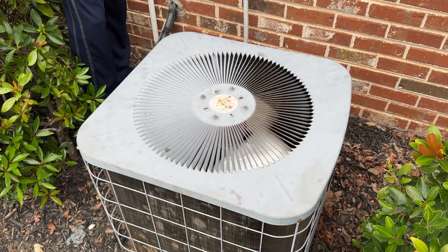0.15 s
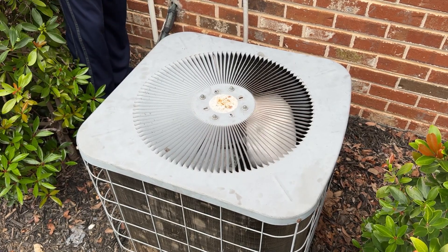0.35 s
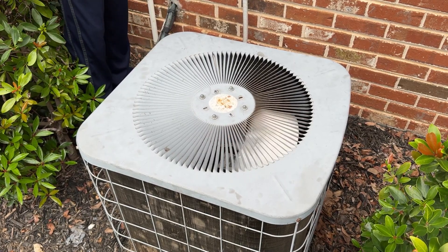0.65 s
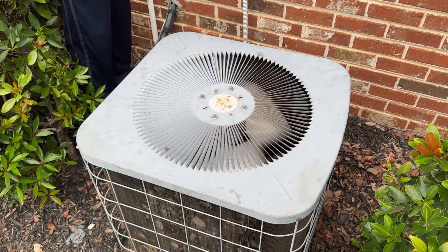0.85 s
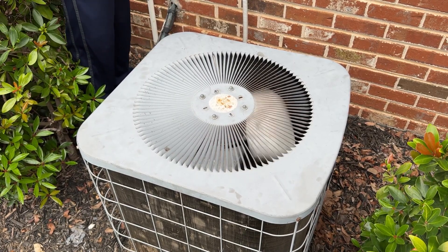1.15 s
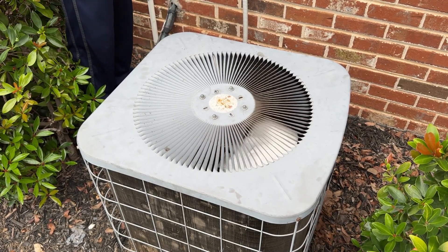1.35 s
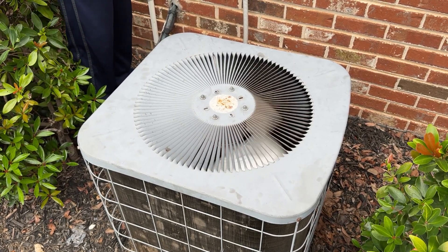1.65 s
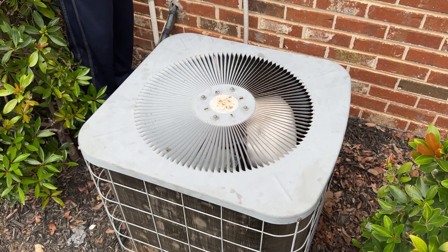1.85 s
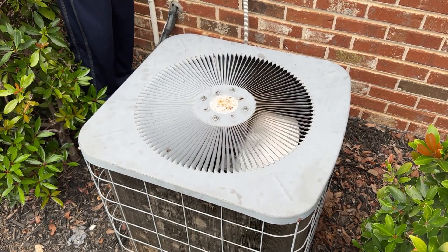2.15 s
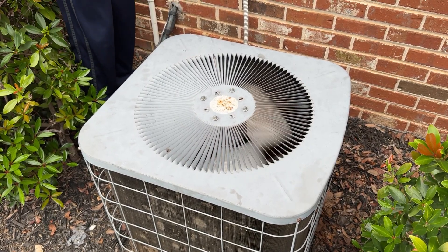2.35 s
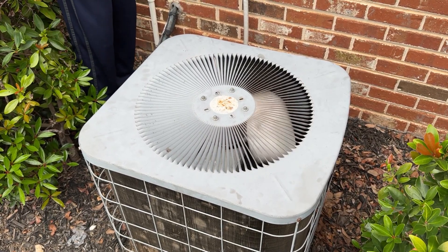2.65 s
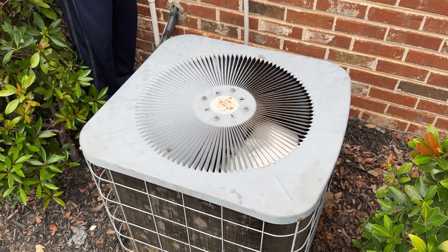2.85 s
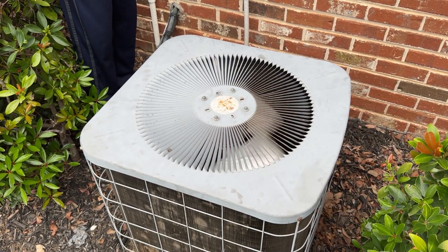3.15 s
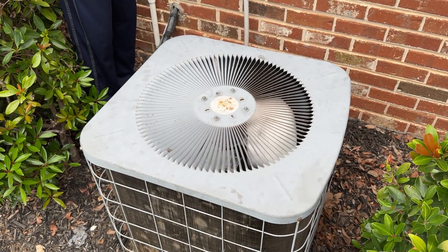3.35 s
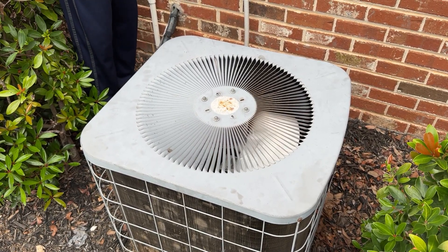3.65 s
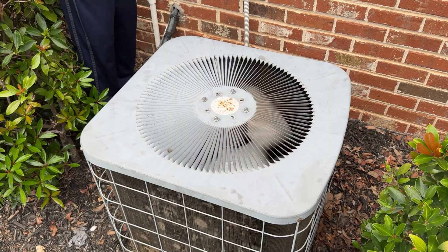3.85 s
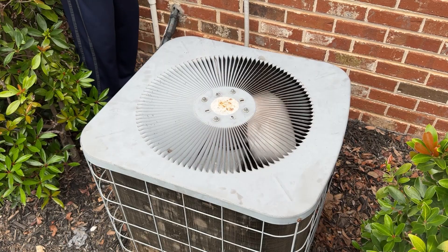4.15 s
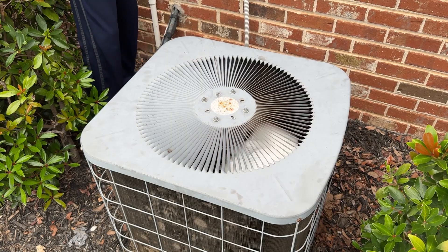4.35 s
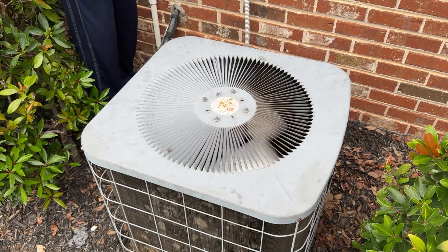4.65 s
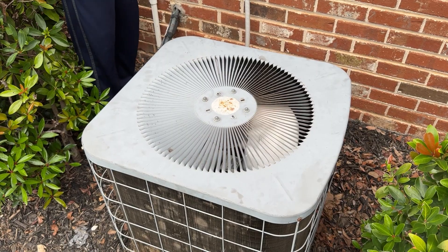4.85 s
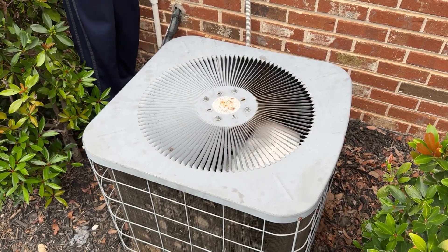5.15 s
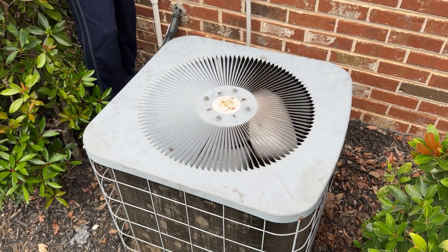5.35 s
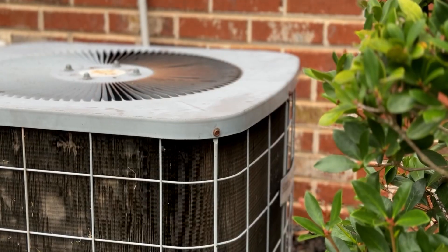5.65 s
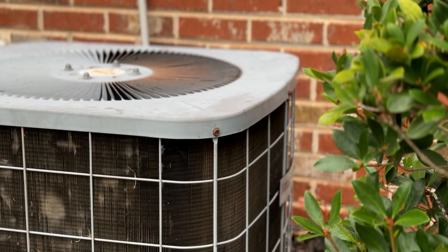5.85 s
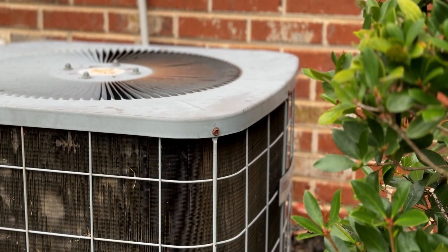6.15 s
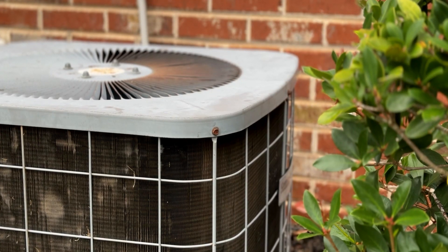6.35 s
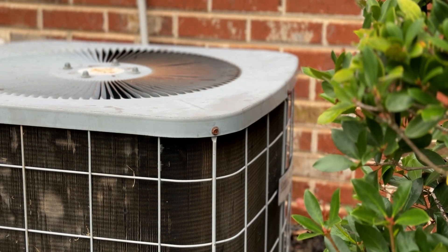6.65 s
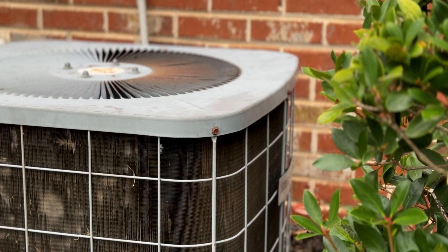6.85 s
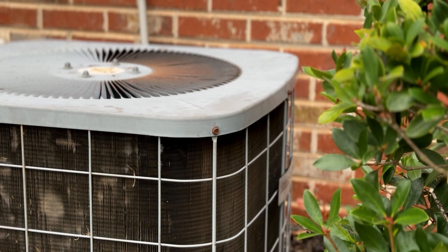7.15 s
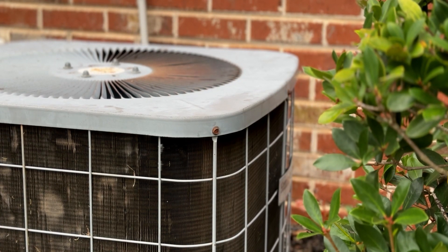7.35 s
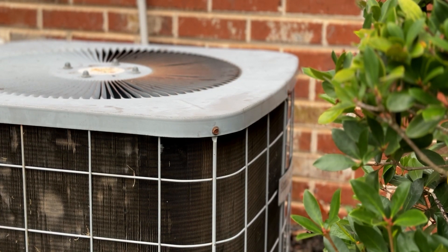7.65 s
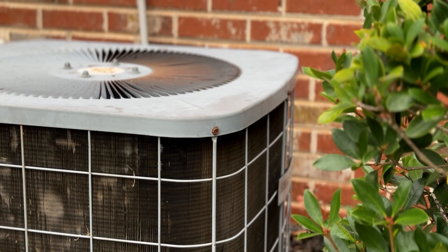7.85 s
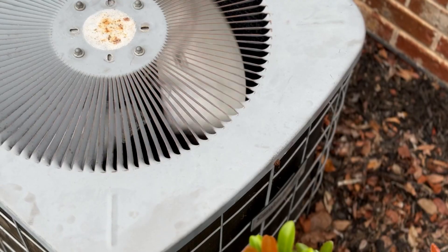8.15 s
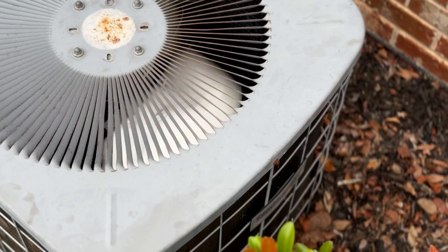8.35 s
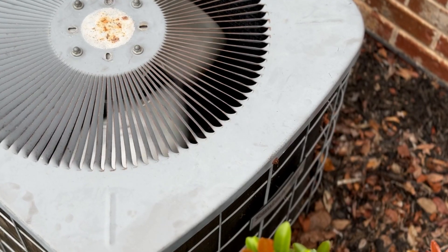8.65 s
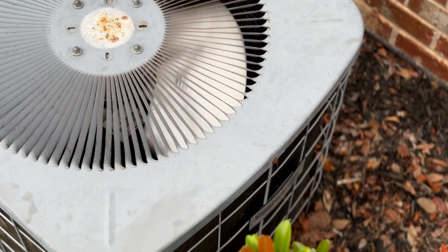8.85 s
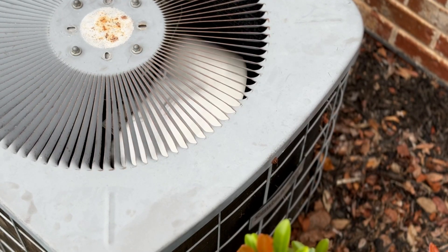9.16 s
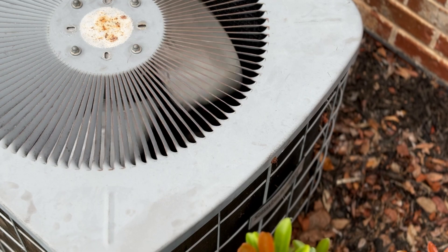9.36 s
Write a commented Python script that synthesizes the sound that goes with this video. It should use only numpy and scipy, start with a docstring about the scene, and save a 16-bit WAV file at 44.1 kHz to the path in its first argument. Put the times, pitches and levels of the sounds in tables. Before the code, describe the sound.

An outdoor air conditioner runs steadily beside a brick wall. Its fan throbs and pushes out a rush of air over a low motor hum and a thin compressor whine. It is heard first from above, with a lightly pulsing hiss. After about five seconds the sound switches to the side, with a stronger whine and soft low rumbles, then moves close over the grille, where the fan drones more strongly.

```python
"""An outdoor air conditioner runs by a brick wall. Its three-blade fan throbs and rushes, the motor iron
hums, and the compressor sings a long series of shaft harmonics. It is heard first from above, where the
hiss climbs and beats; from 5.4 s beside the coil, where low rumbles swell and the sound drops out for a
moment at 7.4 s; and from 8 s close over the grille. Throughout, in the top octave, the right channel
is inverted and early."""
import sys
import numpy as np
from scipy import signal
from scipy.fft import rfft, irfft, next_fast_len
from scipy.io import wavfile
from scipy.ndimage import uniform_filter1d

SR = 44100
rng = np.random.default_rng(int(sys.argv[2]) if len(sys.argv) > 2 else 0)


def bounce(signal):
    """Save signal as a 16-bit WAV file at the path given by the first command-line argument."""
    frames = np.transpose(np.atleast_2d(signal))
    limited = np.clip(frames, -1, 1)
    pcm = np.round(limited * 32767).astype(np.int16)
    wavfile.write(sys.argv[1], SR, pcm)


N = 419391

# Listening places: above, beside, close. "By place" means three values in that order.
# Each row: start and end in seconds, compressor shaft rate in Hz at start and at end, blade rate in Hz.
# The shaft slows as pressure builds.
PLACES = [(0, 5.445, 58.864, 58.832, 57.32), (5.445, 8.0, 58.812, 58.8, 57.4),
          (8.0, 9.52, 58.788, 58.788, 57.35)]
# Likeness of the channels from above, and at the two near places.
# Each row: frequency in Hz, coherence from 0 to 1, right phase lead in radians, left minus right in dB.
STEREO_ABOVE = [(60, .995, 0, -.3), (120, .993, 0, -.3), (250, .999, 0, -.2), (500, .982, -.06, -.2),
                (1100, .93, 0, .8), (1600, .8, 0, 1.4), (2300, .68, -.7, -4.1), (2800, .7, -2.3, -2.5),
                (3700, .18, -3.2, 4), (5250, .56, -5.3, -3), (7000, .4, -6.1, 0), (8300, .7, -6.2, .7)]
STEREO_NEAR = [(60, .998, 0, -.1), (170, .96, 0, 0), (300, .98, -.1, .1), (600, .91, -.17, .2),
               (1100, .97, -.15, 1.0), (1600, .76, 0, 2.6), (1900, .83, .4, 2.3), (2100, .99, 0, .2),
               (2500, .99, 0, .2), (3500, .9, -.6, -.5), (4300, .93, -.2, 0), (4800, 1, 0, 0),
               (6400, 1, 0, 0), (7000, .87, .4, -.2), (7600, 1, 0, 0)]

# Low swells. Each row: crest and width in seconds, frequency in Hz, crest level in dB.
RUMBLES = [(6.1, .5, 70, -38), (7.15, .4, 109, -33.5), (7.85, 0.42, 179, -33.5)]
# Shell resonances. Each row: frequency and width in Hz, base level in dB by place.
RESONANCES = [(4400, 55, -66, -80, -80), (4680, 70, -61, -80, -80), (5270, 260, -59, -72, -70),
              (6280, 260, -62, -72, -66), (13770, 90, -85, -66, -74)]
# Swell of those resonances. Each row: time in seconds, gain in dB.
RING_SWELL = [(0, -3), (1.3, 0), (2, -2), (3.5, 4), (4.4, 3), (5.4, 2)]

# Air through coil and grille. Each row: frequency in Hz, base spectral density in dB by place.
AIR_SPECTRUM = [(25, -78, -80, -79), (40, -68, -68, -67), (50, -54, -58, -55), (66, -50, -50, -52),
                (88, -50, -53, -50), (108, -49, -50, -49), (135, -50, -54, -49), (200, -52.5, -52, -53),
                (262, -51, -57, -54.5), (300, -50, -56.5, -55), (400, -53, -58, -57),
                (480, -55.5, -62, -58.5), (700, -60, -64, -60), (850, -66, -64, -60.5),
                (980, -62, -66, -63), (1180, -66, -70, -66), (1300, -66, -71, -68), (1600, -70, -74, -71),
                (2500, -73, -79, -79), (3050, -79, -80, -80), (3500, -78, -82, -79), (3950, -81, -83, -81),
                (4850, -81, -84, -83), (5200, -81, -85, -83), (5750, -83, -86, -84), (6800, -83, -87, -84),
                (8200, -85, -89, -88), (9300, -88, -93, -93), (11000, -86, -96, -93),
                (12400, -88, -94, -91), (13400, -86, -91, -89), (14300, -90, -93, -92),
                (15600, -92, -94, -93)]
# Broad lifts and dips in that spectrum. Each row: frequency and width in Hz, gain in dB by place.
AIR_LIFTS = [(620, 82, -1.5, 0, 1.5), (746, 180, 2, 1.5, 3), (1050, 120, 1.5, 1, 1),
             (2070, 240, 2, -1, -1.5), (2860, 250, 2, 3, 7), (4380, 150, 3.5, -2.5, 1),
             (5430, 150, -1, -2, -1), (7200, 310, -1.5, 0, -1), (13500, 250, 4, 3, 4)]
# Unevenness of the rush, one row a place. Each row: bass, treble and shared treble flicker in dB,
# then the modulation depths of the fan shaft throb and the gas pulse.
AIR_FLICKER = [(1.3, 0.65, 1.2, 0.05, 0.14), (1.36, .5, 0.6, .02, 0.1), (1.6, 1, 1, .02, .04)]
# Beats in the hiss, blades against compressor and compressor against mains.
# Each row: rate in Hz, depth in dB, time of one crest in seconds.
HISS_BEATS = [(3.13, 0.73, 2.52), (2.26, 0.6, 2.54)]

# Swell of the iron hum. Each row: time in seconds, gain in dB.
IRON_SWELL = [(0, -2), (1, -5), (1.5, 0.5), (5.4, 0.5), (5.8, 0), (6.5, 3), (6.9, 3), (7.3, -4), (7.9, 0),
              (9.5, 0)]
# Fan tones. Each row: multiple of the blade rate, base level in dB by place.
BLADE_TONES = [(1, -40.5, -42, -36.5), (2, -34.5, -43.5, -31.5), (3, -40.5, -49, -43), (4, -37.5, -52, -37),
               (5, -47, -44.5, -48), (6, -55, -47.5, -54)]

# Compressor harmonics: the low ones, those that sing out, and the mean envelope of the other high ones.
# Each row: multiple of the shaft rate, base level in dB by place.
THRUM = [(1, -47, -47, -43), (2, -35, -61, -36), (4, -37, -30, -36), (6, -39.5, -49, -65),
         (7, -58, -50.5, -63), (8, -44, -53, -58)]
WHINE = [(14, -65, -51, -55), (15, -53, -50, -62), (16, -58, -43, -42.5), (18, -50, -40, -39.5),
         (19, -53, -46, -59), (20, -62, -45, -44), (21, -62, -55, -55), (22, -59, -48, -54),
         (23, -67, -52, -57), (25, -70, -51, -52), (26, -57, -63, -50), (27, -64, -62, -50),
         (28, -58, -60, -64), (29, -71, -56, -63), (30, -64, -59, -57), (31, -67, -49, -64),
         (33, -64, -57, -59), (35, -71, -61, -64), (37, -71, -59, -76), (38, -60, -63, -66),
         (46, -70, -64, -60), (47, -65, -50, -52), (48, -66, -58, -56), (49, -69, -59, -59),
         (50, -67, -60, -60), (51, -67, -71, -56), (54, -79, -58, -61), (55, -61, -57, -66),
         (60, -69, -67, -61), (61, -65, -66, -69), (62, -65, -71, -67), (69, -77, -66, -71),
         (75, -70, -68, -80), (77, -80, -68, -79), (81, -75, -62, -67), (82, -72, -66, -69),
         (83, -68, -66, -70), (84, -80, -62, -62), (86, -65, -77, -69), (88, -67, -85, -67),
         (91, -67, -68, -76), (93, -75, -63, -72), (94, -72, -64, -66), (96, -71, -77, -70),
         (98, -78, -76, -60), (101, -76, -63, -75), (103, -71, -77, -69), (104, -73, -68, -67),
         (106, -74, -70, -61), (109, -70, -68, -75), (111, -73, -74, -65), (112, -72, -75, -67),
         (113, -69, -70, -72), (114, -68, -72, -74), (115, -68, -79, -72), (116, -68, -67, -70),
         (117, -68, -74, -64), (118, -68, -77, -76), (119, -72, -74, -73), (120, -75, -67, -69),
         (121, -78, -65, -64), (122, -85, -75, -66), (132, -86, -69, -71), (133, -81, -68, -64),
         (134, -86, -65, -74), (137, -81, -68, -67), (138, -77, -75, -70), (139, -76, -79, -77),
         (221, -80, -67, -74), (224, -80, -69, -73), (226, -80, -66, -73), (234, -79, -65, -71),
         (235, -80, -69, -71), (248, -82, -70, -75)]
WHINE_FLOOR = [(14, -65, -63, -61), (36, -68, -66, -66), (52, -71, -69, -69), (68, -76, -73, -72),
               (85, -72, -73, -72), (100, -77, -75, -72), (127, -80, -74, -72), (165, -79, -75, -76),
               (200, -78, -78, -76), (228, -75, -74, -74), (243, -80, -80, -79), (267, -81, -79, -78)]
# Swell of the two main hums. Each row: time in seconds, gains of harmonics 2 and 4 in dB.
HUM_SWELL = [(0, -4, 2.5), (.6, 2, 3), (1.1, 2, 0), (1.8, 3, 3.5), (2.8, -2, -5), (3.6, 2, -4),
             (4.5, 0.5, -3), (5.4, 7, -5), (5.46, 0, 0), (8, 0, 1), (8.5, 4, -1), (9.5, -5, 1)]
# Swell of the harmonics near 2.8 kHz. Each row: time in seconds, gain in dB.
WHISTLE_SWELL = [(5.5, -2.5), (5.95, 2.5), (6.3, 0), (6.55, -3), (6.75, 3.5), (6.88, -2.5), (7.3, 0.5),
                 (7.5, 1.5), (7.75, -2), (8.1, 2.5), (8.7, 0), (9.3, 0)]

IN_PHASE_S = (1.93, 6.43, 8.65)  # by place: the hums of fan, compressor and iron crest together
BUFFET_DEPTH = (.18, .15, .2)  # by place: base depth of the blade throb in the rush
MAINS_HZ, IRON_BASE_DB = 60, (-36, -38.5, -41.5)  # levels by place
TURN = 2 ** 16  # samples in the wavetable of one rotation


def undb(db):
    """Amplitude grows tenfold for every 20 dB."""
    return 10 ** (np.asarray(db, float) / 20)


def walk(size, rate_hz):
    """Low-pass random motion: held levels, smoothed twice, with a spread near 1."""
    hold = int(SR / rate_hz)
    levels = np.repeat(rng.standard_normal(size // hold + 1), hold)
    return 1.28 * uniform_filter1d(uniform_filter1d(levels, hold), hold)[:size]


def swell(t, table):
    """A gain envelope, linear in decibels between the rows of a table."""
    return undb(np.interp(t, *np.transpose(table)))


def partials(table, place):
    """The line spectrum at one place: harmonic orders and levels in dB."""
    rows = np.array(table)
    return np.round(rows[:, 0]).astype(int), rows[:, place + 1]


def stereo(hz, place):
    """Partial coherence: the likeness, phase lead and balance of the channels at each frequency."""
    knots, coherence, lead, pan_db = np.transpose(STEREO_NEAR if place else STEREO_ABOVE)
    top = hz > 8700
    coherence = np.where(top, .94, np.interp(hz, knots, coherence))
    # Inversion and a time lead of 1/3150 s turn the phase steadily with frequency.
    lead = np.where(top, 2 * np.pi * (hz - 11025) / 3150, np.interp(hz, knots, lead))
    return coherence, lead, np.where(top, 0, np.interp(hz, knots, pan_db))


def harmonics(t, place, rate_hz, orders, db, drift, waver_db, groups=1, in_phase=None):
    """Fourier series of a drifting rotation. Returns the stereo sound and the angle in turns."""
    coherence, lead, pan_db = stereo(orders * np.mean(rate_hz), place)
    phase, scatter = rng.standard_normal((len(orders), 2)).T
    if in_phase is not None:  # harmonics 2 and 4 crest at this sample
        phase[np.isin(orders, (2, 4))] = 0
    right_shift = np.exp(1j * (lead + np.arccos(coherence) * scatter))
    balance = np.array([undb(pan_db / 2), undb(-pan_db / 2) * right_shift])
    amplitudes = undb(db) * np.exp(2j * np.pi * phase) * balance
    angle = np.cumsum(rate_hz * (1 + drift * walk(len(t), 2.01))) / SR
    angle = (angle - angle[in_phase or 0]) % 1
    out = 0
    for k in range(groups):  # each group wavers independently
        spectrum = np.zeros((2, TURN // 2 + 1), complex)
        spectrum[:, orders[k::groups]] = amplitudes[:, k::groups]
        cycle = irfft(spectrum) * TURN / np.sqrt(2)
        out = out + undb(waver_db * walk(len(t), 7.01)) * cycle[:, (angle * TURN).astype(int)]
    return out, angle


def rumble(t):
    """Narrow-band low noise swells under Gaussian envelopes, alike in both channels."""
    out = 0
    for crest, width, hz, db in RUMBLES:
        bandpass = signal.butter(2, [hz / 1.1, hz * 1.1], "bandpass", fs=SR, output="sos")
        band = signal.sosfilt(bandpass, rng.standard_normal(len(t)))
        envelope = np.exp(-.5 * (2 * (t - crest) / width) ** 2)
        out = out + undb(db) * envelope * band / band.std()
    return out


def shell_ringing(t, place):
    """Resonance: gas hiss excites narrow modes of the shell, each fluttering alone."""
    size = next_fast_len(len(t))
    hz = np.arange(size // 2 + 1) * SR / size
    _, lead, _ = stereo(hz, place)
    out = 0
    for mode_hz, width, *db in RESONANCES:
        band = rfft(rng.standard_normal(size)) / (1 + (2 * (hz - mode_hz) / width) ** 4)
        pair = irfft(np.array([band, band * np.exp(1j * lead)]), size)[:, :len(t)]
        out = out + undb(db[place] + walk(len(t), 5)) * pair / pair.std()
    return out * swell(t, RING_SWELL)


def hiss_beating_db(t):
    """Beating: the treble from above throbs at two difference frequencies as it climbs and wanders."""
    climb = -1.5 * np.exp(-t / .62)
    beats = sum(db * np.cos(2 * np.pi * hz * (t - crest)) for hz, db, crest in HISS_BEATS)
    return climb + beats + .4 * walk(len(t), 7.4)


def air_spectrum(hz, size, place):
    """Flow through coil and grille makes broadband noise, partly coherent between the channels."""
    rows = np.array(AIR_SPECTRUM)
    colour = undb(np.interp(np.log(hz), np.log(rows[:, 0]), rows[:, place + 1])) * np.sqrt(SR / 2)
    for centre, width, *lift_db in AIR_LIFTS:
        colour *= undb(lift_db[place] / (1 + (2 * (hz - centre) / width) ** 2))
    coherence, lead, pan_db = stereo(hz, place)
    left, independent = rfft(rng.standard_normal((2, size)))
    right = coherence * np.exp(1j * lead) * left + np.sqrt(1 - coherence ** 2) * independent
    return colour * np.array([left * undb(pan_db / 2), right * undb(-pan_db / 2)])


def air_rush(t, place, blade_hz, shaft_angle):
    """Amplitude modulation: flickering bands of air noise throb with blades, fan shaft and gas pulses."""
    size = next_fast_len(len(t))
    hz = np.maximum(np.arange(size // 2 + 1) * SR / size, 1)
    spectrum = air_spectrum(hz, size, place)
    bass_db, treble_db, flutter_db, throb_depth, pulse_depth = AIR_FLICKER[place]
    flutter = walk(len(t), 40)
    shared_db = flutter_db * (flutter - uniform_filter1d(flutter, SR // 6))  # only the quick part
    if place == 0:
        shared_db += hiss_beating_db(t)
    # One fan turn is three blade passes; gas leaves twice a compressor turn.
    throb = throb_depth * np.sin(2 * np.pi * blade_hz / 3 * t)
    pulse = pulse_depth * (np.sin(4 * np.pi * shaft_angle) + .7 * np.sin(8 * np.pi * shaft_angle))
    # Every blade pass buffets the air, some gusts harder than others.
    buffet = BUFFET_DEPTH[place] * undb(3.3 * walk(len(t), 6)) * np.sin(2 * np.pi * blade_hz * t)
    out = 0
    for centre in 20 * 2 ** np.arange(0, 10.5, .5):  # half-octave steps from 20 Hz
        window = np.clip(1 - 2 * abs(np.log2(hz / centre)), 0, 1)
        treble = np.clip(np.log(centre / 1200) / np.log(9000 / 1200), 0, 1)
        middle = np.clip(1 - abs(np.log2(centre / 550)) / 2, 0, 1)
        own_db = (bass_db + (treble_db - bass_db) * treble) * walk(len(t), 14)
        gain = undb(own_db + treble * shared_db) * (1 + treble * (throb + pulse) + middle * buffet)
        out = out + gain * irfft(spectrum * window, size)[:, :len(t)]
    return out


def iron_hum(t, place, in_phase):
    """Forced vibration: the motor iron hums at four times the mains frequency."""
    hum, _ = harmonics(t, place, MAINS_HZ, np.array([4]), IRON_BASE_DB[place],
                       drift=.0001, waver_db=1.1, in_phase=in_phase)
    return swell(t, IRON_SWELL) * hum


def fan_blades(t, place, blade_hz, in_phase):
    """Periodic blade passage radiates harmonics, made unsteady by the turbulent inflow."""
    tones, _ = harmonics(t, place, blade_hz, *partials(BLADE_TONES, place),
                         drift=.00092, waver_db=2.5, groups=3, in_phase=in_phase)
    return tones


def compressor_thrum(t, place, shaft_hz, in_phase):
    """Forced vibration: the shell radiates low shaft harmonics; the second and fourth swell and sink."""
    orders, db = partials(THRUM, place)
    steady = ~np.isin(orders, (2, 4))
    thrum, _ = harmonics(t, place, shaft_hz, orders[steady], db[steady],
                         drift=.00032, waver_db=0, groups=2)
    times, *swells_db = np.transpose(HUM_SWELL)
    for order, swell_db in zip((2, 4), swells_db):
        row = orders == order
        hum, _ = harmonics(t, place, shaft_hz, orders[row], db[row],
                           drift=.00025, waver_db=.5, in_phase=in_phase)
        thrum += undb(np.interp(t, times, swell_db)) * hum
    return thrum


def compressor_whine(t, place, shaft_hz):
    """The shell's uneven response colours a comb of high harmonics. Returns sound and shaft angle."""
    strong, strong_db = partials(WHINE, place)
    knots, floor_db = partials(WHINE_FLOOR, place)
    weak = np.setdiff1d(np.arange(knots[0], knots[-1]), strong)
    scatter_db = 3 * np.minimum(rng.standard_normal(len(weak)), 1.5)
    weak_db = np.interp(weak, knots, floor_db) + scatter_db
    orders, db = np.r_[strong, weak], np.r_[strong_db, weak_db]
    whistling = (orders >= 46) & (orders <= 52)  # near 2.8 kHz
    whine, shaft_angle = harmonics(t, place, shaft_hz, orders[~whistling], db[~whistling],
                                   drift=.00006, waver_db=1.3, groups=4)
    whistle, _ = harmonics(t, place, shaft_hz, orders[whistling], db[whistling],
                           drift=.00006, waver_db=1.8, groups=2)
    return whine + swell(t, WHISTLE_SWELL) * whistle, shaft_angle


def scene():
    """Superposition: the sources add at each place in turn, joined by equal-power crossfades."""
    out = np.zeros((2, N))
    margin_s, fade_s = .05, .004
    for place, (start, end, shaft_from_hz, shaft_to_hz, blade_hz) in enumerate(PLACES):
        first, last = max(int((start - margin_s) * SR), 0), min(int((end + margin_s) * SR), N)
        t = np.arange(first, last) / SR
        in_phase = int(IN_PHASE_S[place] * SR) - first
        shaft_hz = np.interp(t, [start, end], [shaft_from_hz, shaft_to_hz])
        thrum = compressor_thrum(t, place, shaft_hz, in_phase)
        whine, shaft_angle = compressor_whine(t, place, shaft_hz)
        sound = thrum + whine + shell_ringing(t, place)
        sound += fan_blades(t, place, blade_hz, in_phase) + iron_hum(t, place, in_phase)
        sound += air_rush(t, place, blade_hz, shaft_angle)
        fade_in = np.clip((t - start) / fade_s + .5, 0, 1) if place else 1
        fade_out = np.clip((end - t) / fade_s + .5, 0, 1)
        out[:, first:last] += np.sqrt(fade_in * fade_out) * sound
    return out + rumble(np.arange(N) / SR)


def record(dry):
    """Gating and band limiting: a dropout of 21 ms, then a steep low-pass at 15.7 kHz."""
    t = np.arange(N) / SR
    closing, opening = (7.4318 - t) / .0012, (t - 7.4527) / .00023
    gate = np.clip(np.maximum(closing, opening), .015, 1)
    lowpass = signal.ellip(16, .5, 70, 15735, fs=SR, output="sos")
    return signal.sosfilt(lowpass, dry * gate)


dry = scene()
out = record(dry)
bounce(out)
```